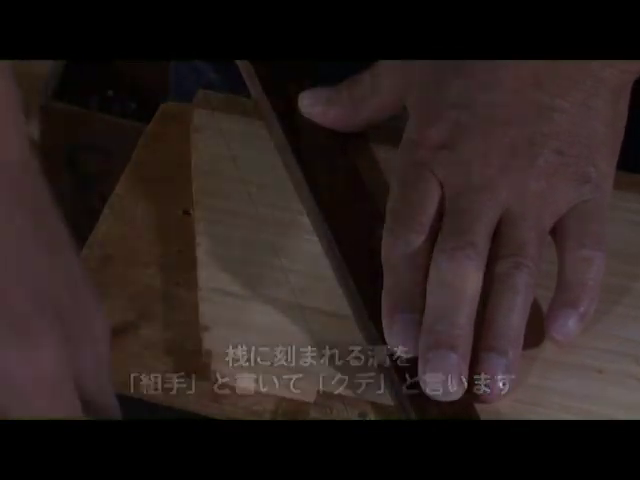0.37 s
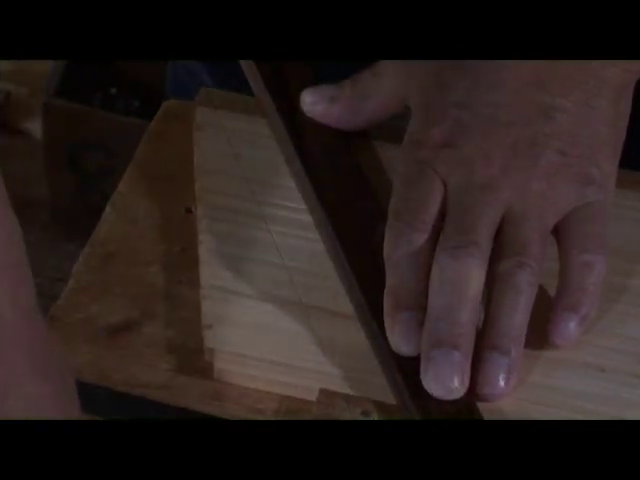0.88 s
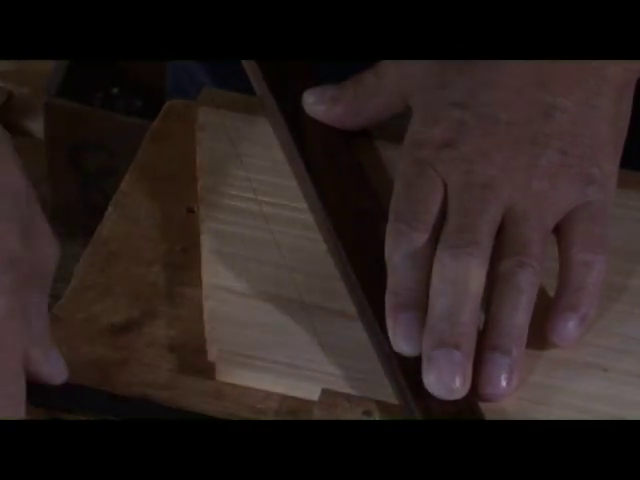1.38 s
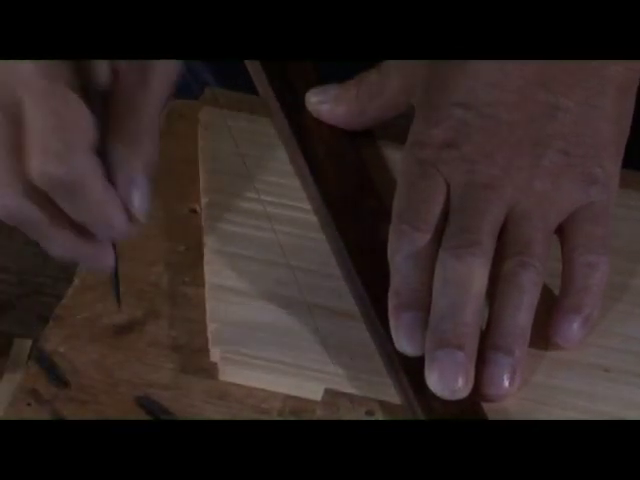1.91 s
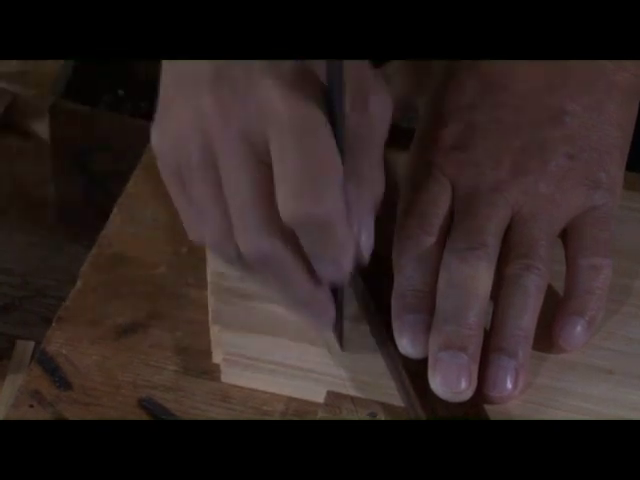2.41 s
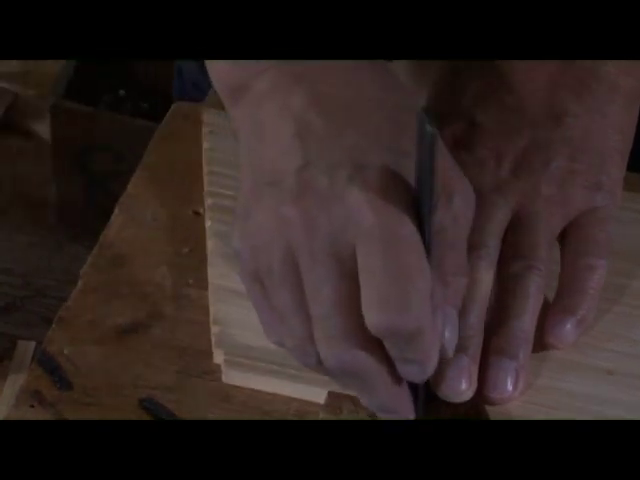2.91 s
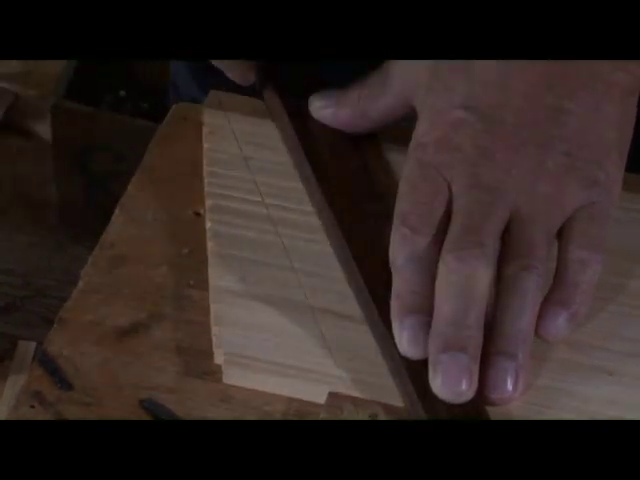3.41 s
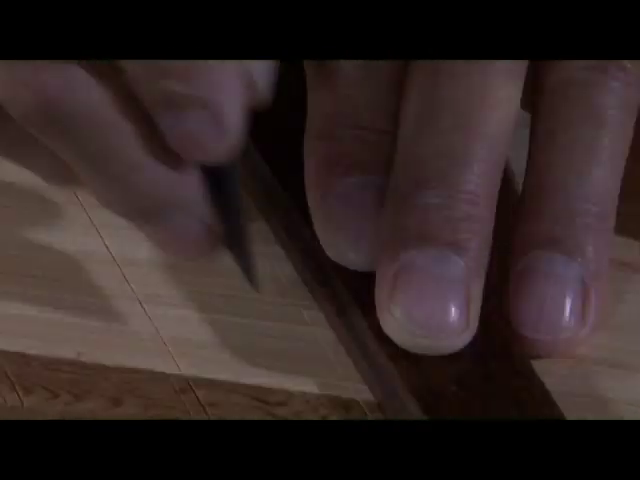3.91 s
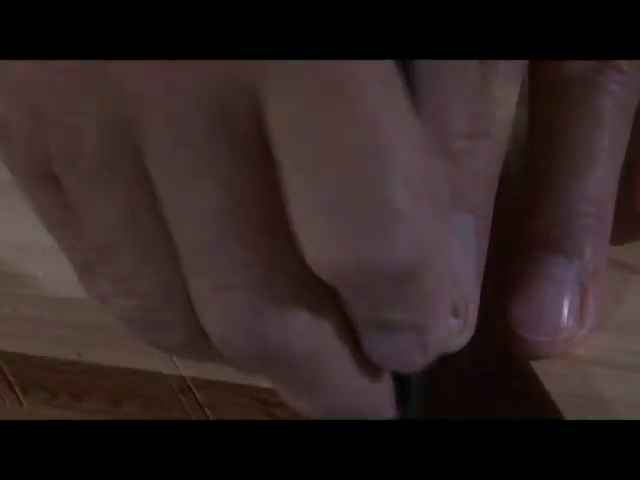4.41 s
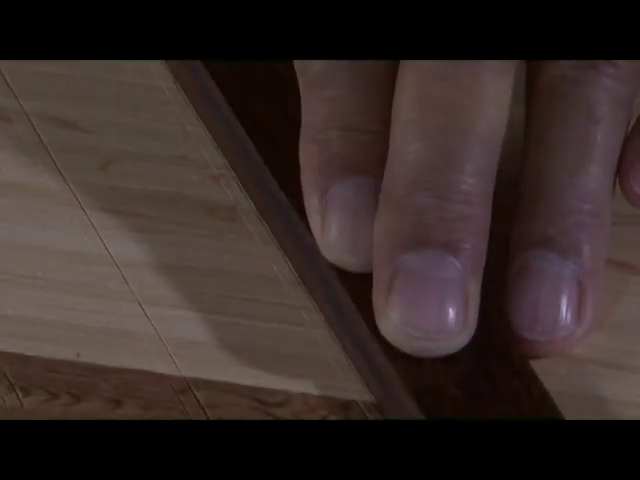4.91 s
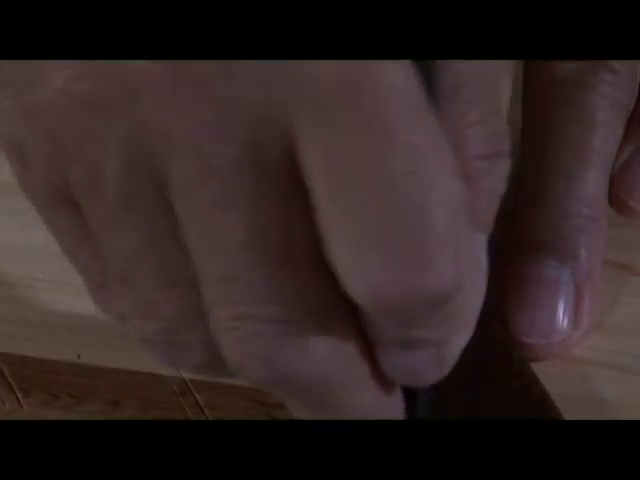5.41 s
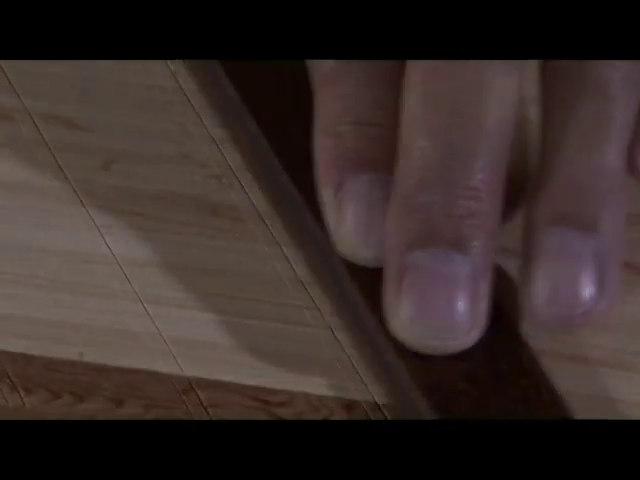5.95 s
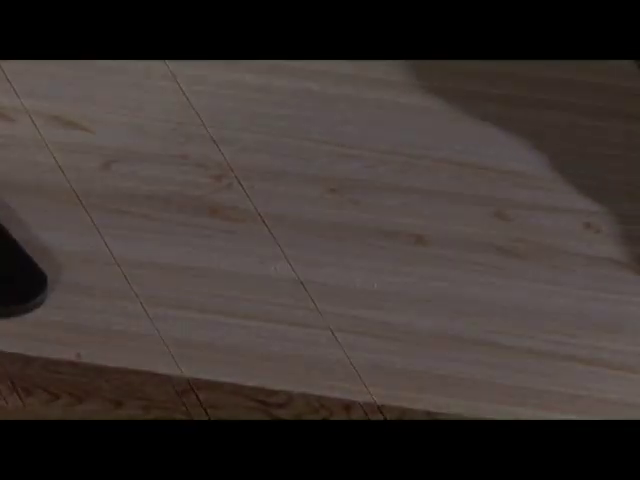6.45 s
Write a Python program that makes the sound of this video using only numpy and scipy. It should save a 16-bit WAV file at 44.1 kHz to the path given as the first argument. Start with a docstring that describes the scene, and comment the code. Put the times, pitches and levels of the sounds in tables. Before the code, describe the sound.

On a wooden workbench in a quiet room, sharp knocks come first, then a round object rocks to rest in soft paired taps as hands brush wood. A steel knife rasps three brief, crackling strokes across thin strips, with small taps between. Loud clacks and a thin steel ring end it. Close microphone, faint hiss and low hum, background dipping after loud hits.

```python
"""A steel marking knife is drawn three times across thin wooden strips: random fibre snaps ring blade and boards.
Before, between and after the strokes blows (crack, tick, wood modes, noisy tail) fall on the bench; before the
first, a round object rocks, two decaying touches a swing. Hands brush the wood (grainy noise, one squeak),
steel rings in dying sines, the bench booms low over a narrow hum, and a gain control ducks all,
hiss included, after loud sounds."""
import sys
import numpy as np
from scipy import signal
from scipy.fft import rfft, irfft, next_fast_len
from scipy.io import wavfile
from scipy.ndimage import uniform_filter1d

SR = 44100
rng = np.random.default_rng(int(sys.argv[2]) if len(sys.argv) > 2 else 0)


def wav_record(signal):
    """Record a signal, one row per channel, as 16-bit PCM in the file named by sys.argv[1]."""
    frames = np.transpose(np.atleast_2d(signal))
    bounded = np.clip(frames, -1, 1)
    # unit amplitude maps onto the largest positive 16-bit level
    quanta = np.round(bounded * 32767).astype(np.int16)
    wavfile.write(sys.argv[1], SR, quanta)


def attenuation_scalar(level_db):
    """Turn a level in dB into a linear amplitude multiplier (20 dB per decade)."""
    decades = np.asarray(level_db, float) / 20
    return 10 ** decades


N = 289516

# modes of the wooden boards: f/Hz, relative level/dB, t60/s
WOOD = [(147.5, 2.5, 0.21), (213.2, -0.5, 0.21), (295.7, 3, 0.16), (335, 0.5, 0.061), (369.5, 7.5, 0.091),
        (451.2, 4.5, 0.1), (502, 1, 0.094), (657, -3, 0.19)]
# decay of the room by band: f/Hz, t60/s
ROOM_DECAY = [(150, 0.7), (500, 0.57), (1500, 0.4), (3200, 0.41), (5000, 0.36), (6500, 0.16), (12000, 0.28)]


def evened(x):
    """Scales to rms 1."""
    return x / np.sqrt(np.mean(x ** 2) + 1e-20)


def read(points, hz):
    """Reads a table on a log-frequency axis."""
    f, value = np.transpose(points)
    return np.interp(np.log(hz + 1), np.log(f + 1), value)


def add(mix, s, sound):
    """Mixes a sound in at time s."""
    part = mix[round(s * SR):][:len(sound)]
    part += sound[:len(part)]


def filtered(x, response):
    """Filters the last axis by a response in dB."""
    n = x.shape[-1]
    size = next_fast_len(n)
    gain = attenuation_scalar(read(response, np.fft.rfftfreq(size, 1 / SR)))
    return irfft(rfft(x, size) * gain, size)[..., :n]


def coloured(x, spectrum):
    """Filters x by a spectrum, then scales to rms 1."""
    return evened(filtered(x, spectrum))


def resonate(x, hz, width_hz):
    """One-pole resonance of gain 1: shift hz to zero, low-pass, shift back."""
    turn = np.exp(2j * np.pi * np.cumsum(hz * np.ones(len(x))) / SR)
    r = np.exp(-np.pi * width_hz / SR)
    return 2 * (turn * signal.lfilter([1 - r], [1, -r], x / turn)).real


def resonate_twice(x, hz, width_hz):
    """Two equal resonances in series, for steeper skirts."""
    return resonate(resonate(x, hz, width_hz), hz, width_hz)


def ring(modes, spread=0., seconds=.5):
    """Dying sines; spread varies the level and pitch of each mode from blow to blow."""
    t = np.arange(round(seconds * SR)) / SR
    out = np.zeros(len(t))
    for hz, db, t60_s in modes:
        level_chance, pitch_chance = rng.standard_normal(2)
        decay = attenuation_scalar(db + 100 * spread * level_chance - 60 * t / t60_s)
        out += decay * np.sin(2 * np.pi * hz * (1 + spread * pitch_chance) * t)
    return out


def crack(hz, cycles, spread):
    """Short noisy ring of peak 1 with a brief build-up; spread is resonance width over pitch."""
    t = np.arange(1500) / SR
    puff = rng.standard_normal(len(t)) * np.exp(-t * hz / cycles) * (1 - np.exp(-t / 0.000086))
    sound = resonate_twice(puff, hz, spread * hz) + 0.017 * puff
    return sound / abs(sound).max()


def split(x, low_gain, high_gain):
    """Evens x under and over 3 kHz separately and gives each its gain."""
    lows = signal.sosfiltfilt(signal.butter(2, 3000, "low", fs=SR, output="sos"), x)
    return low_gain * evened(lows) + high_gain * evened(x - lows)


def arch(start_s, length_s, top, db, drop_db):
    """Gain of a gesture: quick start, rounded swell to its peak at share top, soft end."""
    bite_s, lift_s = .004, .025
    u = (np.arange(N) / SR - start_s) / length_s
    top = np.clip(top, .05, .95)
    away = np.where(u < top, 1 - u / top, (u - top) / (1 - top))
    ends = np.clip(u * length_s / bite_s, 0, 1) * np.clip((1 - u) * length_s / lift_s, 0, 1)
    return ends * attenuation_scalar(db - drop_db * np.minimum(away, 1) ** 1.44)


def pressure():
    """Knife pressure sets the gains of scrape, treble and boards; the boards peak late and linger."""
    # start/s, length/s, peak position/share of length, scrape under 3 kHz/dB, treble over 3 kHz/dB, boards/dB
    strokes = [(3.159, 0.28, 0.46, -39, -43, -34), (4.604, 0.28, 0.42, -37, -40, -37),
               (5.563, .25, 0.6, -35.5, -41, -34)]
    late_share, linger_s = 0.017, 0.064
    gains = np.zeros((3, N))
    for s, length_s, top, scrape_db, treble_db, boards_db in strokes:
        gains[0] += arch(s, length_s, top, scrape_db, drop_db=21.5)
        gains[1] += arch(s, length_s, top, treble_db, drop_db=2)
        gains[2] += arch(s, length_s + linger_s, top + late_share, boards_db, drop_db=14)
    return gains


def boom():
    """The bench rings low and slowly after blows and when leaned on."""
    # t/s, f/Hz, level/dB, t60/s
    booms = [(0.0, 57.7, -51.5, 4.3), (0.7, 54.5, -61, 0.68), (1.17, 58.7, -41.5, 0.77),
             (1.4, 54.8, -43, 0.53), (1.63, 61.3, -45, 0.35), (2.046, 54.8, -33, 0.55),
             (2.38, 59, -44, 0.36), (2.5, 58.5, -33, 0.44), (2.65, 52.8, -44.5, 0.55),
             (2.8, 54.6, -55.5, 1.9), (3.177, 58.6, -33, 0.54), (3.358, 58.7, -26, 0.59),
             (3.785, 59.2, -23.5, 0.37), (4.06, 66, -40, .4), (4.131, 53.8, -43, 0.76),
             (4.621, 64.5, -41, .5), (4.82, 67, -30, 0.55), (4.97, 95.5, -36.5, 0.29),
             (5.399, 72, -51.5, .6), (5.59, 70.8, -43, 0.49), (5.76, 94.5, -40, 0.77),
             (5.87, 55.5, -35.5, 0.76), (6.181, 94.6, -40.5, 1.02), (6.36, 69, -57, 1)]
    out, t = np.zeros(N), np.arange(SR) / SR
    rise = 1 - np.exp(-(t / 0.015) ** 2)
    for s, hz, db, t60_s in booms:
        add(out, s, ring([(hz, db, t60_s)], seconds=1.) * rise)
    return out


def hum():
    """Two narrow noise bands waver as a low hum and swell with the boards under the knife."""
    lower = resonate_twice(rng.standard_normal(N), 57, 25)
    upper = resonate_twice(rng.standard_normal(N), 99, 45)
    boards_gain = pressure()[2]
    lower_gain = attenuation_scalar(-62.5) + attenuation_scalar(-13.5) * boards_gain
    upper_gain = attenuation_scalar(-78) + attenuation_scalar(-11.5) * boards_gain
    return lower_gain * evened(lower) + upper_gain * evened(upper)


def hiss():
    """Steady coloured noise fills the room."""
    # f/Hz, relative level/dB
    hiss_spectrum = [(53, -17), (90, 1), (125, -7), (154, 5.5), (180, -12.5), (205, -0.5), (240, -7.5),
                     (312, -1), (414, -9), (870, -13), (2300, -14.5), (5200, -16.5), (16500, -23.5)]
    return attenuation_scalar(-59.5) * coloured(rng.standard_normal(N), hiss_spectrum)


def brushes():
    """Hands and tools rub wood as grainy noise; one drag squeaks through a narrow resonance."""
    # start/s, length/s, peak position/share of length, level under 3 kHz/dB, level over 3 kHz/dB
    gestures = [(0.05, 0.55, 0.67, -67.5, -66.5), (1.401, 0.066, .4, -64, -55.5),
                (1.45, 0.074, 1, -46.5, -78), (1.501, 0.103, 1, -45, -50), (1.613, .12, 0.13, -43, -90),
                (2.692, 0.19, 0.66, -66.5, -62), (2.868, 0.076, 0.26, -60, -70),
                (3.077, 0.16, 0.78, -57.5, -54.5), (3.95, 0.13, 0.34, -59.5, -60.5),
                (4.256, 0.12, 0.7, -80, -55), (4.38, 0.29, .1, -90, -61.5), (4.522, 0.094, 1, -64, -56),
                (5.136, 0.16, 0.21, -73, -61.5), (5.255, 0.18, 0.29, -61, -53), (5.456, 0.16, 1, -62, -54),
                (5.898, 0.042, 0.55, -66, -52.5), (5.967, 0.34, 0.57, -56, -49.5)]
    # f/Hz, relative level/dB
    rub_spectrum = [(300, 10), (700, 14.5), (1500, 13.5), (3000, -3), (4400, -2.5), (6500, -12.5),
                    (16000, -16)]
    # one row: start/s, length/s, peak position/share of length, level/dB
    squeak_gesture = (1.505, .12, .8, -58)
    squeak_hz, drop_db = 6450, 18
    grain_db = 1.8 * evened(uniform_filter1d(rng.standard_normal(N), size=300))
    rub = rng.standard_normal(N) * attenuation_scalar(grain_db)
    squeak = evened(resonate(resonate(rub, squeak_hz, 365), squeak_hz, 350))
    low_gain, high_gain = np.zeros((2, N))
    for s, length_s, top, low_db, high_db in gestures:
        low_gain += arch(s, length_s, top, low_db, drop_db)
        high_gain += arch(s, length_s, top, high_db, drop_db)
    return split(coloured(rub, rub_spectrum), low_gain, high_gain) + arch(*squeak_gesture, drop_db) * squeak


def room(x):
    """Sparse echoes of random sign, each band dying at its own speed."""
    taps = np.zeros(SR)
    at = np.arange(200, SR - 20, 20)
    taps[at + rng.integers(0, 20, len(at))] = rng.choice([-1., 1.], len(at))
    hz, t, z = signal.stft(taps, SR, nperseg=256)
    decay = attenuation_scalar(-60 * t / read(ROOM_DECAY, hz)[:, None])
    tail = signal.istft(z * decay, SR, nperseg=256)[1]
    return signal.fftconvolve(x, tail / np.linalg.norm(tail))[:N]


def afterglow(colour):
    """Fresh noise of a blow's colour dies band by band: loose wood and walls answering."""
    hz, t = np.fft.rfftfreq(256, 1 / SR)[:, None], np.arange(400) * 64 / SR
    a, b = rng.standard_normal((2, 129, 400))
    z = (a + 1j * b) * colour(hz) * attenuation_scalar(-60 * t / read(ROOM_DECAY, hz))
    tail = signal.istft(z, nperseg=256, noverlap=192)[1]
    return tail * (1 - np.exp(-np.arange(len(tail)) / 71.0))


def knocks():
    """A blow cracks and ticks, excites wood modes near its thud pitch, and leaves a noisy tail."""
    # t/s, crack peak/dB, crack centre f/Hz, thud gain/dB, thud f/Hz, tick gain/dB
    blows = [(0.098, -66, 930, -51.5, 264, -50), (0.598, -38.5, 1352, -60.5, 349, -37),
             (0.942, -18, 933, -21, 657, -14.5), (0.98, -26, 1360, -25, 560, -26),
             (1.129, -20.5, 1030, -17, 559, -16), (1.388, -77, 1190, -46, 560, -44.5),
             (1.471, -41, 1050, -48, 546, -57), (1.499, -31, 1520, -43.5, 677, -60),
             (1.553, -42, 1030, -39.5, 675, -44), (1.579, -35, 1420, -45, 430, -50),
             (1.605, -33, 1370, -41.5, 430, -31.5), (1.627, -25, 1510, -37.5, 625, -66),
             (2.041, -26.5, 1130, -30.5, 270, -33.5), (2.49, -27.5, 1010, -33, 242, -33),
             (2.882, -44, 1990, -54, 216, -55), (3.783, -35, 1070, -35.5, 284, -27),
             (3.983, -46, 1404, -64, 147, -50), (4.056, -39, 930, -38, 188, -28),
             (4.373, -32.5, 2070, -73, 377, -32), (4.491, -45, 3140, -67, 149, -45.5),
             (5.303, -37.5, 1870, -56, 241, -32.5), (5.46, -44, 3520, -59, 213, -51),
             (5.495, -51, 3075, -55.5, 156, -44), (6.165, -16.5, 1080, -32.5, 780, -17),
             (6.221, -26.5, 900, -43.5, 500, -41), (6.311, -13.5, 4170, -35, 344, -11.5),
             (6.405, -24, 1360, -40, 325, -22), (6.426, -25, 1470, -61, 291, -24)]
    # bright edge of a blow: f/Hz, relative level/dB
    tick_spectrum = [(900, 2.5), (2000, 10.5), (3000, 6), (5000, 3), (8000, -5.5), (16000, -11)]
    # what the walls give back: f/Hz, relative level/dB
    wall_spectrum = [(300, 4), (700, -2), (1300, 12.5), (2200, 7), (3300, 4.5), (3800, -0.5), (5200, 4),
                     (6000, -4), (16000, -29)]
    thud_tail_db, crack_echo_db, tick_echo_db = 16, -47, -44
    out, t = np.zeros(N), np.arange(SR // 2) / SR
    edge = np.exp(-t[:800] / 0.0019) * (1 - np.exp(-t[:800] / 0.00041))
    thud_rise = 1 - np.exp(-t / 0.0024)
    for s, crack_db, crack_hz, thud_db, thud_hz, tick_db in blows:
        near = []
        for hz, db, t60_s in WOOD:
            db_per_octave = 5 if hz > thud_hz else 11
            near.append((hz, db - db_per_octave * abs(np.log2(hz / thud_hz)), t60_s))
        tick = coloured(rng.standard_normal(800), tick_spectrum) * edge
        add(out, s, attenuation_scalar(crack_db) * crack(crack_hz, cycles=2.44, spread=0.38))
        add(out, s, attenuation_scalar(tick_db) * tick)
        add(out, s, attenuation_scalar(thud_db) * ring(near, spread=0.034) * thud_rise)

        def colour(f):
            """Wide humps at thud and crack; the walls colour crack and tick."""
            crack_hump_db = -8.1 * abs(np.log2((f + 30) / crack_hz))
            echo = attenuation_scalar(crack_db + crack_echo_db + crack_hump_db) + attenuation_scalar(tick_db + tick_echo_db)
            thud_hump_db = -8.5 * abs(np.log2((f + 30) / thud_hz))
            thud = attenuation_scalar(thud_db + thud_tail_db + thud_hump_db) / np.sqrt(thud_hz)
            return thud + echo * attenuation_scalar(read(wall_spectrum, f))
        add(out, s, afterglow(colour))
    return out


def rocker():
    """A round object rocks to rest: soft hollow touches of dying modes, two a swing."""
    # t/s, gain of first touch/dB, gain of touch on the swing back/dB
    rocks = [(1.295, -36, -41), (1.388, -41.5, -55), (1.47, -40.5, -60), (1.745, -37.5, -45),
             (1.854, -39, -45), (1.968, -37, -39), (2.085, -32, -42), (2.18, -39, -47), (2.265, -37.5, -46),
             (2.358, -39.5, -48), (2.437, -41, -54), (2.517, -36, -57), (2.607, -43, -42.5),
             (2.734, -43.5, -45), (2.847, -44, -49), (2.946, -52, -49), (3.032, -51, -54),
             (3.121, -51, -60)]
    # f/Hz, relative level/dB, t60/s
    hollow_modes = [(547.4, 5.5, 0.065), (500, 13.5, 0.024), (1110, 7, 0.015)]
    back_share, longest_swing_s = .475, .13
    out, t = np.zeros(N), np.arange(SR // 2) / SR
    rise = 1 - np.exp(-t / 0.0091)
    swings_s = np.minimum(np.diff([s for s, *_ in rocks], append=N), longest_swing_s)
    for (s, db, back_db), swing_s in zip(rocks, swings_s):
        for at_s, touch_db in (s, db), (s + back_share * swing_s, back_db):
            add(out, at_s, attenuation_scalar(touch_db) * ring(hollow_modes, spread=0.011) * rise)
    return out


def steel():
    """A small metal part pings; a steel tool set down rings thin and high until a hand damps it."""
    # t/s, then modes: f/Hz, level/dB, t60/s
    ping = (2.041, [(4650, -54, .2)])
    # t/s, gain/dB, free ringing before damping/s
    steel_hits = [(6.311, -45, .092), (6.404, -45, .023)]
    # f/Hz, relative level/dB, t60/s
    steel_modes = [(7174, 0, .45), (10148, 2, .4), (13390, -5, .12), (12800, -12, .12), (9700, -10, .1)]
    out, t = np.zeros(N), np.arange(SR // 2) / SR
    add(out, ping[0], ring(ping[1]))
    for s, db, free_s in steel_hits:
        damping_db = 310 * np.maximum(t - free_s, 0)
        add(out, s, attenuation_scalar(db - damping_db) * ring(steel_modes))
    return out


def fibre_snaps():
    """Fibres snap at random over rough noise, in clumps of varying level."""
    clumps = uniform_filter1d(uniform_filter1d(rng.standard_normal(N), size=110), size=110)
    snap_db = 2.3 * np.minimum(rng.exponential(1, N), 4)
    snaps = rng.standard_normal(N) * (rng.random(N) < 2000 / SR) * attenuation_scalar(snap_db)
    return (evened(snaps) + 0.99 * rng.standard_normal(N)) * attenuation_scalar(3 * evened(clumps))


def snags(gain):
    """Small random catches crack while the knife moves, scaled by the scrape gain."""
    per_s, low_hz, high_hz = 160, 1300, 6500
    out = np.zeros(N)
    for at in np.flatnonzero((rng.random(N) < per_s / SR) & (gain > 0)):
        hz = low_hz * (high_hz / low_hz) ** rng.random()
        size = gain[at] * attenuation_scalar(5.5 + 3.5 * rng.standard_normal())
        add(out, at / SR, size * crack(hz, cycles=hz / 2500, spread=2000 / hz))
    return out


def catches():
    """The tip catches hard on strip edges, each a short crack at its own pitch."""
    # t/s, peak/dB, ring f/Hz
    edge_catches = [(3.162, -42, 4560), (3.183, -23, 6310), (3.211, -21.5, 4290), (3.245, -24, 3300),
                    (3.27, -27, 1970), (3.28, -18, 1710), (3.302, -13, 4250), (3.31, -24, 2110),
                    (3.35, -19, 4500), (3.42, -44, 1890), (4.607, -30.5, 2920), (4.644, -30, 1950),
                    (4.721, -20, 2142), (4.742, -20, 3000), (4.76, -20.5, 1200), (4.856, -28, 4290),
                    (5.567, -35, 3080), (5.673, -22, 1980), (5.687, -23, 1765), (5.698, -23, 1920),
                    (5.716, -19, 2140)]
    out = np.zeros(N)
    for s, db, hz in edge_catches:
        add(out, s, attenuation_scalar(db) * crack(hz, cycles=hz / 1000, spread=1700 / hz))
    return out


def knife():
    """Fibres snapping under the tip ring blade and strips; the boards answer lower."""
    # fibres tearing: f/Hz, relative level/dB
    tear_spectrum = [(400, -44), (800, -21), (1070, -50), (1550, -4), (2000, 9.5), (3000, -28), (4280, 1),
                     (5700, -10.5), (8400, -12), (16000, -20)]
    # blade and strip resonances: f/Hz, width of each of two passes/Hz, relative level/dB
    blade_modes = [(1070, 580, 29), (1830, 290, 21.5), (3000, 870, 18), (4290, 450, -34), (5130, 460, 13),
                   (6260, 210, 0)]
    low_gain, high_gain, boards_gain = pressure()
    drive = fibre_snaps()
    rung = np.zeros(N)
    for k, (hz, width_hz, db) in enumerate(blade_modes):
        # the same snaps shifted in time for each mode: the grain changes colour
        shifted_snaps = np.roll(drive, 997 * k)
        rung += attenuation_scalar(db) * resonate_twice(shifted_snaps, hz, width_hz)
    scrape = coloured(drive, tear_spectrum) + 1.18 * evened(rung)
    rubbing = evened(drive) + 1.53 * rng.standard_normal(N)
    boards = sum(attenuation_scalar(db) * resonate(rubbing, hz, 90) for hz, db, _ in WOOD)
    stroke = split(scrape, low_gain, high_gain) + boards_gain * evened(boards)
    return stroke + snags(low_gain + high_gain) + catches()


def scene():
    """Knocks bring their own tails; the rubbing sounds pass through the room."""
    rubbed = brushes() + knife()
    echoed = rubbed + attenuation_scalar(-13.5) * room(rubbed)
    return (boom() + hum() + hiss() + echoed + knocks() + rocker() + steel())[None]


def gain_control(heard):
    """Ducks after loud sounds: held level over a threshold, lagged, sets the cut, which creeps back."""
    power_db = 10 * np.log10(abs(uniform_filter1d(heard[0] ** 2, size=900)) + 1e-12)
    fall_db = np.arange(N) * 55.0 / SR  # the held level falls 55 dB/s
    held_db = np.maximum.accumulate(power_db + fall_db) - fall_db
    over_db = np.maximum(held_db + 44, 0)  # threshold -44 dB
    lagged_db = signal.lfilter([.002], [1, -.998], over_db)
    return heard * attenuation_scalar(-.35 * lagged_db)


def top_cut(x):
    """Nothing passes above the cut-off."""
    return signal.sosfilt(signal.butter(12, 16640, fs=SR, output="sos"), x)


def record(dry):
    """The microphone's response dips in the treble; gain control follows."""
    # f/Hz, gain/dB
    mic_response = [(25, -1), (40, -5), (52, 3), (7500, 0), (8500, -1), (9300, -7.5), (10500, -3.5),
                    (12000, -12), (13300, -1), (14500, -6), (15500, -1.5), (16300, -27)]
    heard = filtered(dry, mic_response)
    mix = gain_control(heard)
    return top_cut(mix)


dry = scene()
out = record(dry)
wav_record(out)
```